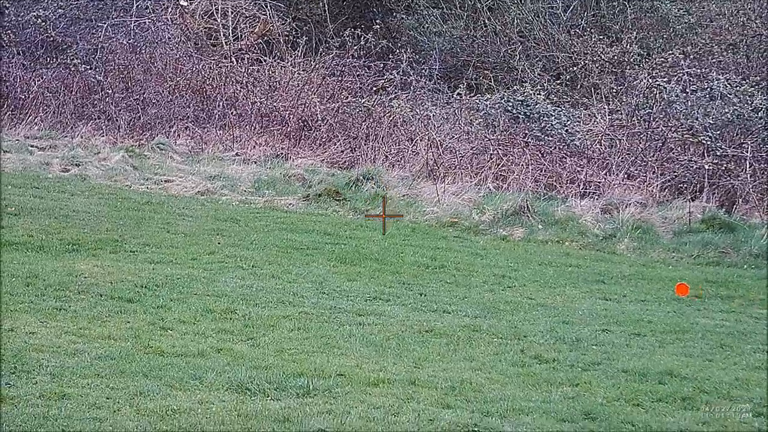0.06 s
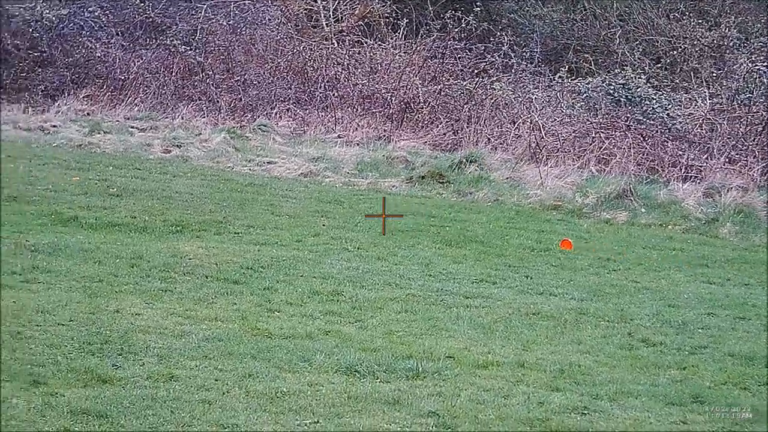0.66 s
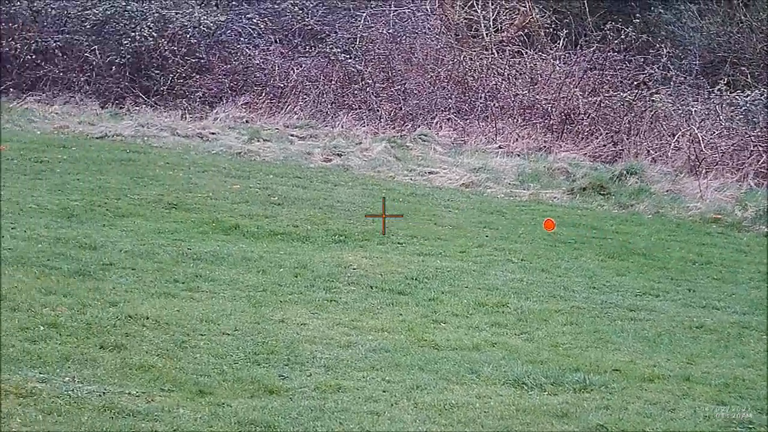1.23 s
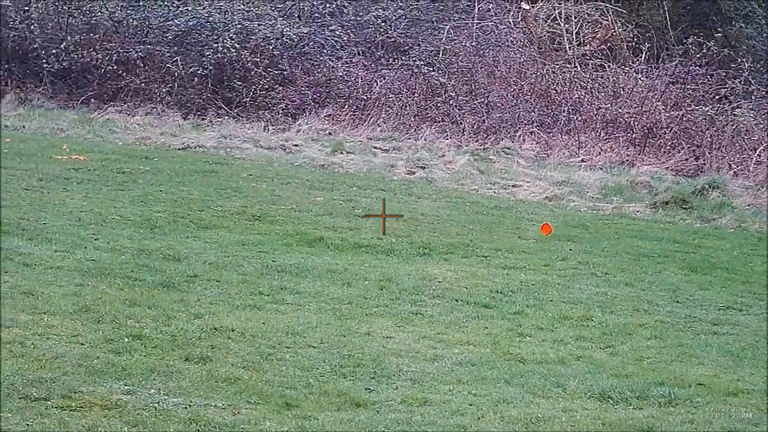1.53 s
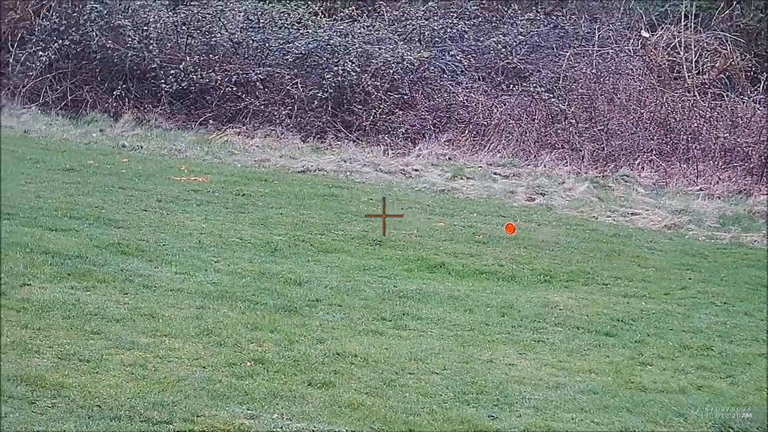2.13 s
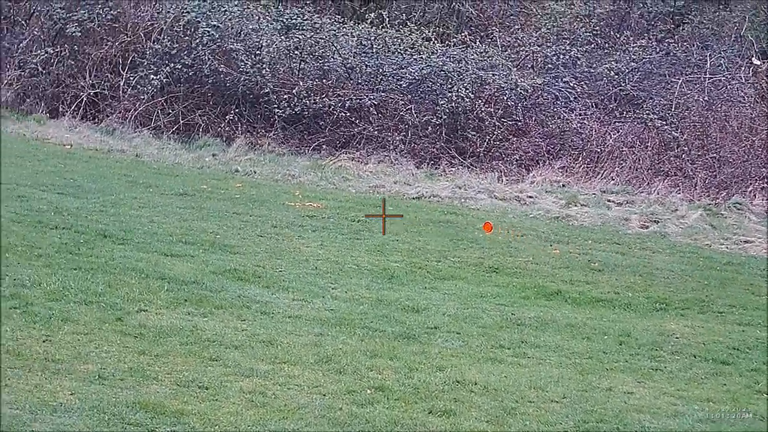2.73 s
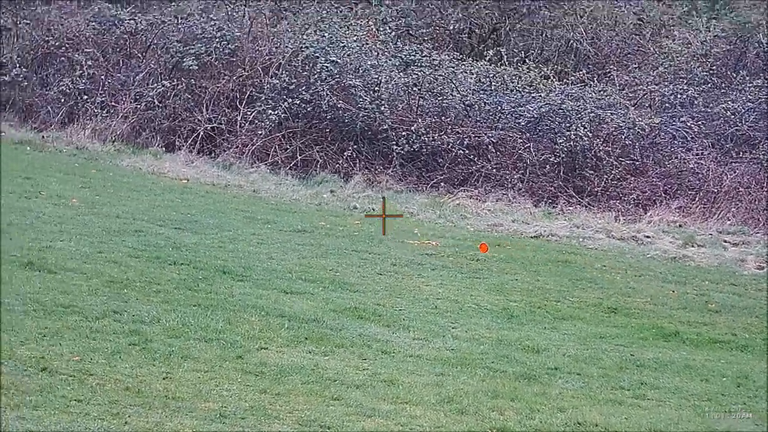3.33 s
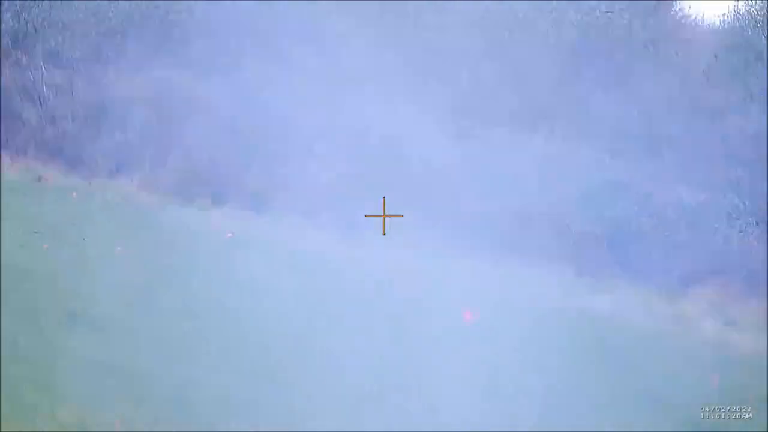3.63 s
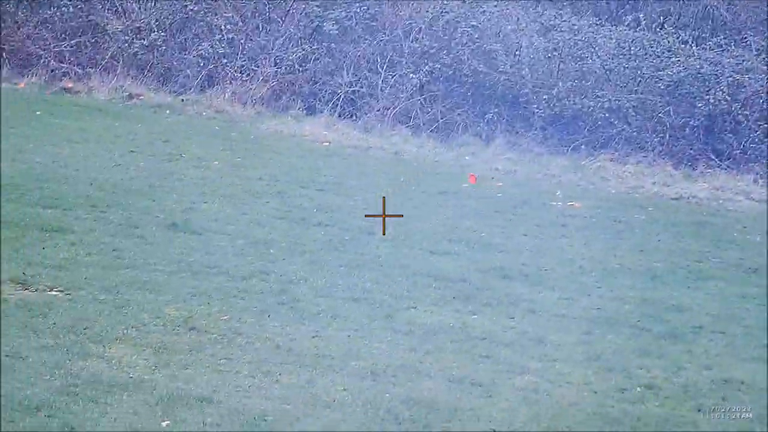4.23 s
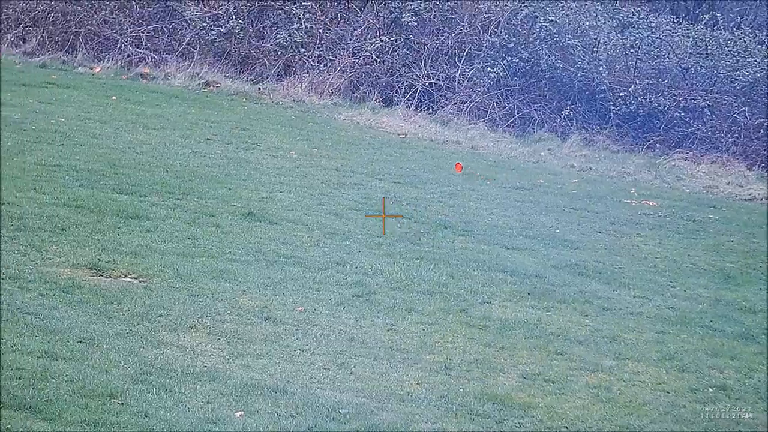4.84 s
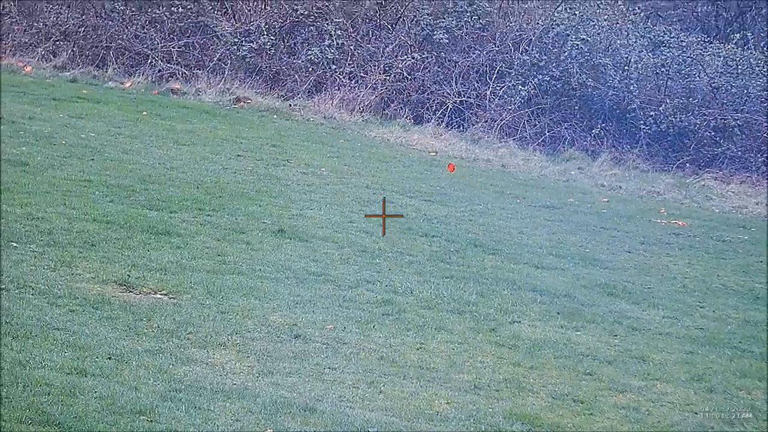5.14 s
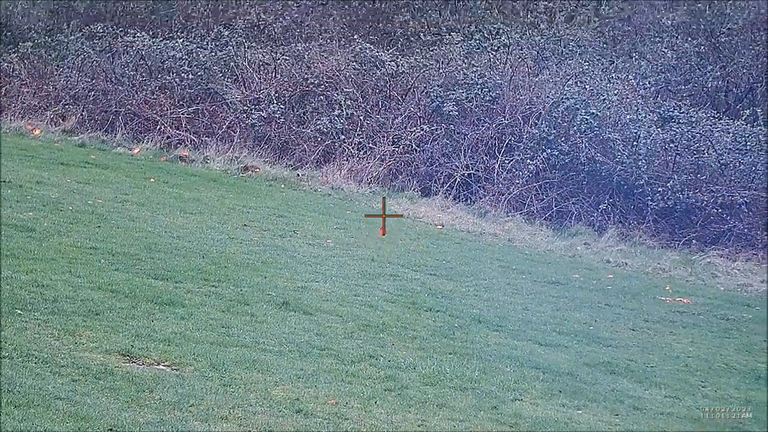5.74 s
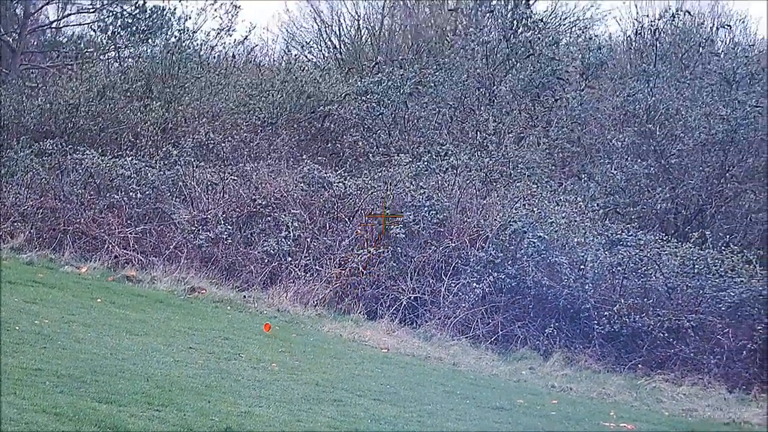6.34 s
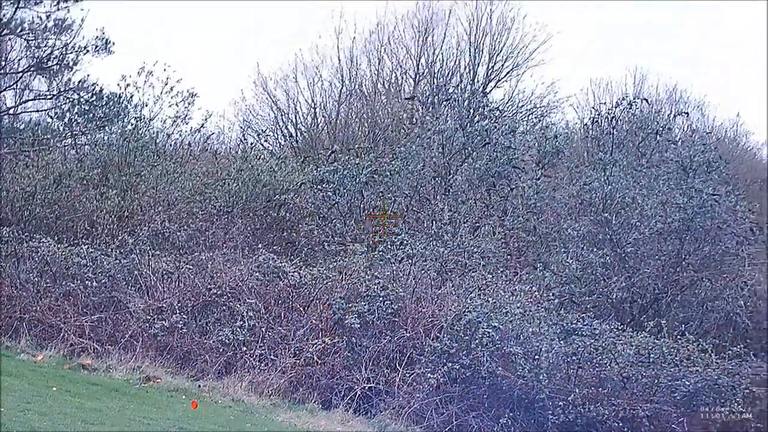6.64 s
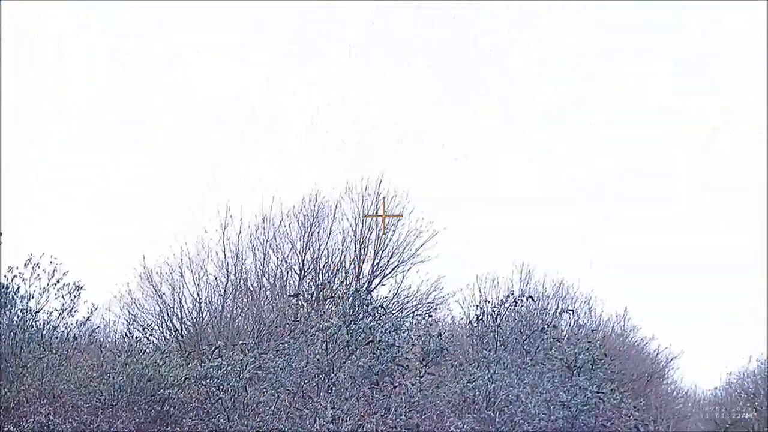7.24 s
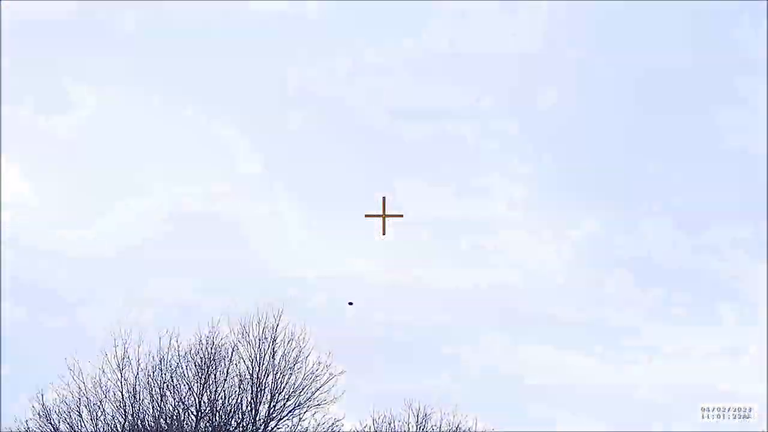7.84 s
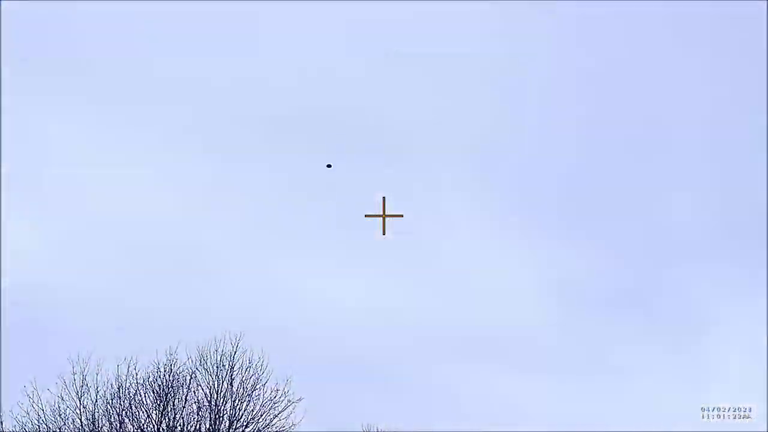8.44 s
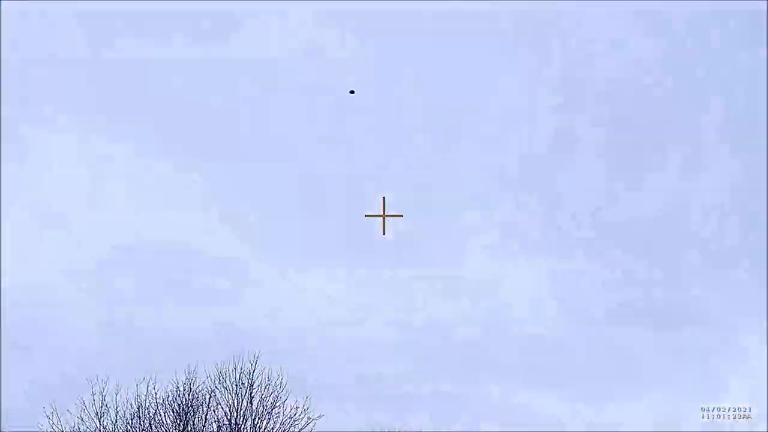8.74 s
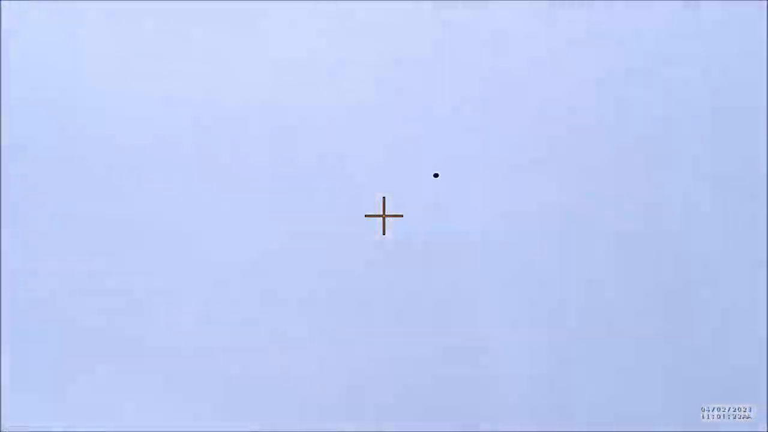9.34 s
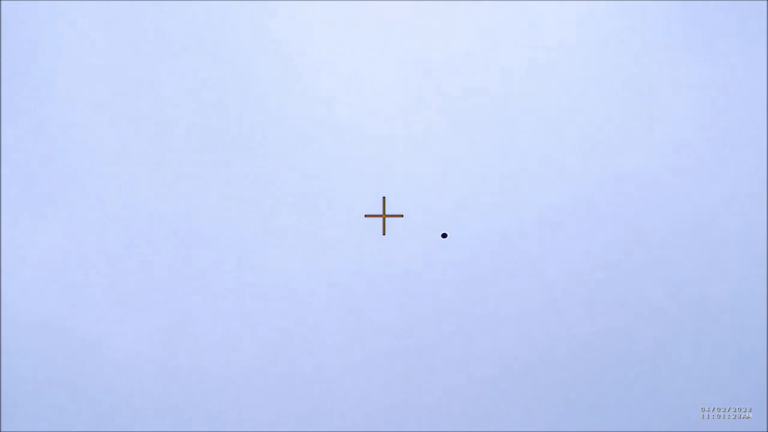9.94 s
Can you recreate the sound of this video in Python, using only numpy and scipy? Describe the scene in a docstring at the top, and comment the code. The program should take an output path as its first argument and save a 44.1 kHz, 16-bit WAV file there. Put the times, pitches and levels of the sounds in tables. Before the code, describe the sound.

A single shotgun blast bursts out of a quiet field, harsh and distorted because the microphone sits on the gun. The recoil adds a thump and a short ringing shudder. About half a second later a clack and a deep boom return from the trees, then an uneven rumbling echo fades slowly. One soft handling knock comes well before the shot and one well after, amid light hiss and very faint distant birds.

```python
"""Open field by a wood: one shotgun shot, heard by a small camera clamped to the barrel.
The hammer falls, blast and recoil overload the microphone, the barrel shudders and rings.
The wood's edge slaps back and the echo rolls away. The camera's housing colours blows and echoes.
Two soft knocks on the gun and faint birds sit in the hiss and rumble."""
import sys
import numpy as np
from scipy import signal
from scipy.fft import rfft, irfft, next_fast_len
from scipy.io import wavfile
from scipy.ndimage import map_coordinates

SR = 44100
rng = np.random.default_rng(int(sys.argv[2]) if len(sys.argv) > 2 else 0)


def digitize_waveform(pressure):
    """Quantize a signal to 16-bit integers and store it at the path in sys.argv[1].

    Rows of a 2-D input are taken as channels; values are limited to [-1, 1].
    """
    field = np.atleast_2d(pressure).T
    bounded = np.clip(field, -1, 1)
    quanta = np.round(bounded * 32767).astype(np.int16)
    wavfile.write(sys.argv[1], SR, quanta)


N = 440118
TIME = np.arange(N) / SR
SHOT_S, RECOIL_END_S = 3.7878, 3.868
WOOD_S, WOOD_RISE_S = 4.358, 0.053  # onset of the rolling echo

# Camera housing resonances. Each row: centre in Hz, width in Hz, lift in dB.
HOUSING_PEAKS = [(347, 110, 15), (722, 160, 12), (910, 55, 3.5), (1154, 240, 10), (1770, 190, 13.5),
                 (2040, 81, 9), (2620, 220, 3.5), (3995, 300, 5.5)]
# Knocks on the gun. Each row: start in seconds, level in dB.
KNOCK_HITS = [(1.302, -39.5), (9.291, -35)]
# Bird phrases. Each row: first note in seconds, last note in seconds, relative level in dB.
BIRD_PHRASES = [(1.39, 2.52, -81), (4.34, 5.69, -82), (7.28, 8.63, -83)]
# Recoil shoves on the diaphragm. Each row: start in seconds, length in seconds, peak in full scales.
RECOIL_SHOVES = [(3.8045, .0132, 11), (3.8175, .0228, -9), (3.8385, .029, -3.2)]
# Stands of trees that swell the echo. Each row: centre and half width in seconds,
# lift of the low part and of the high part in dB.
TREE_STANDS = [(4.412, .012, 8, 1), (4.675, .025, 6, -2), (4.803, .008, 3, 5), (4.845, .025, 5.5, 2.5),
               (4.93, .02, 5, -1), (5.015, .025, 5, 0), (5.185, 0.028, 5.5, 5), (5.315, .035, 9, 9),
               (5.495, .04, 9, 8), (5.6, .04, 6.5, 1.5), (6.13, .05, 3.5, 2), (7.45, .2, 2, 11)]

# Short bursts. Each row: start in seconds, relative level in dB, rise and t60 in seconds,
# low and high corner in Hz.
ACTION_BLOWS = [(3.7768, -25, 0.00088, 0.089, 400, 2502), (3.7825, -6, 0.0021, 0.021, 900, 850),
                (3.7852, -19, 0.00071, .03, 900, 4500), (3.8385, 4, 0.0017, 0.058, 400, 1460),
                (3.8665, -14, .002, .09, 697, 1190), (3.872, -21.5, 0.00086, 0.042, 900, 5000)]  # hammer, primer, recoil stop, rattle
WOOD_SLAPS = [(4.241, -46, 0.0019, 0.062, 904, 899), (4.433, -53.5, .003, 0.087, 3000, 3700),
              (4.437, -28, 0.0028, 0.064, 100, 1100), (4.480, -30.5, 0.0049, 0.13, 200, 1020),
              (4.4885, -29, 0.0036, 0.038, 1060, 3400), (5.135, -52, .004, .06, 2998, 1000)]  # distinct echoes off the wood's edge

# Damped modes. Each row: frequency in Hz, relative level in dB, t60 in seconds.
HOUSING_KNOCK_MODES = [(371, 1.5, 0.058), (408, -0.5, 0.04), (487, -4.5, 0.049), (700, -9.5, 0.027)]
CLAMP_MODES = [(132.7, 14, .07), (276, 20.5, .055), (713.6, 19.5, 0.068)]
BARREL_MODES = [(274.6, -30, 0.653), (428, -21.5, 0.141), (705, -23, 0.34), (1803.4, -6, 0.031)]
HOUSING_CLACK_MODES = [(1137, -23, 0.057), (1762, -21, 0.046), (2020, -33, 0.053), (4110, -35, 0.028)]  # rung by the sharpest echo
HOUSING_THUD_MODES = [(341, -20.5, 0.097)]  # rung by a dull echo from deep in the wood

# Noise spectra. Each row: frequency in Hz, relative density in dB.
HISS_SPECTRUM = [(100, -8), (150, 9), (350, 8), (600, 4.5), (1000, 2.5), (2500, -1), (5000, -3.5),
                 (7500, -3)]
RUMBLE_SPECTRUM = [(8, 10), (20, -0.5), (35, -6.5), (60, -12.5), (100, -20), (200, -30.5), (600, -59.5)]
BLAST_SPECTRUM = [(20, -10), (70, -2), (200, -5), (400, -1), (550, -8), (1000, -8), (1600, -9), (3000, -21),
                  (7000, -30)]
WASH_SPECTRUM = [(20, -9.5), (90, 3.5), (150, -1), (270, 1.5), (345, -6), (450, -3.5), (700, -4.5),
                 (1500, -15), (3000, -17), (4000, -19.5), (7000, -22)]  # blast off grass and hedge
ROLL_LOW_SPECTRUM = [(50, -29), (120, -13.5), (230, -6.5), (450, -6.5), (650, -13), (1000, -32.5),
                     (2000, -70)]
ROLL_HIGH_SPECTRUM = [(300, -25), (550, -3.5), (750, -1), (1200, -8), (1700, -16), (2200, -13.5),
                      (3300, -16.5), (4200, -23), (8000, -56)]
BOOM_SPECTRUM = [(8, -19), (22, 10.5), (55, -9.5), (100, -24), (200, -37), (600, -71)]


def amp(db):
    return 10 ** (np.asarray(db) / 20)


def unit_rms(x):
    return x / np.sqrt(np.mean(x ** 2) + 1e-20)


def wobble(rate_hz):
    """Smooth random curve, rate_hz knots a second."""
    coarse_s = TIME[::16]
    knots = rng.standard_normal(int(N * rate_hz / SR) + 4)
    return np.interp(TIME, coarse_s, map_coordinates(knots, [coarse_s * rate_hz], order=2))


def filtered(x, response):
    """Zero-phase filter with gain response(hz)."""
    size = next_fast_len(N + 8192)
    return irfft(rfft(x, size) * response(np.fft.rfftfreq(size, 1 / SR)), size)[:N]


def housing(hz):
    """Gain of the camera's closed, resonant shell."""
    return amp(sum(db / (1 + (2 * (hz - centre_hz) / width_hz) ** 2)
                   for centre_hz, width_hz, db in HOUSING_PEAKS))


def noise(spectrum, housed=True):
    """Shaped noise of rms 1, by default through the housing."""
    points_hz, points_db = np.transpose(spectrum)

    def response(hz):
        db = np.interp(np.log(hz + 1), np.log(points_hz + 1), points_db)
        return amp(db) * (housing(hz) if housed else 1)
    return unit_rms(filtered(rng.standard_normal(N), response))


def burst(start_s, rise_s, t60_s):
    """Envelope: rise, then exponential fall."""
    out, first = np.zeros(N), round(start_s * SR)
    age_s = np.arange(min(2 * t60_s * SR, N - first)) / SR
    out[first:][:len(age_s)] = (1 - np.exp(-age_s / rise_s)) * amp(-60 * age_s / t60_s)
    return out


def ringing(modes, start_s, rise_s):
    """Damped modes struck together."""
    out, age_s = np.zeros(N + SR), np.arange(SR) / SR
    ring = sum(amp(db - 60 * age_s / t60_s) * np.sin(2 * np.pi * hz * age_s) for hz, db, t60_s in modes)
    out[round(start_s * SR):][:SR] = ring * (1 - np.exp(-age_s / rise_s))
    return out[:N]


def air_loss(x, start_s, limit_s, db_per_khz_s=12):
    """Later sound has crossed more air and lost more above 1 kHz."""
    hz, time_s, spectra = signal.stft(x, SR, nperseg=512)
    loss_db = db_per_khz_s * np.outer(hz / 1000 - 1, np.clip(time_s - start_s, 0, limit_s))
    return signal.istft(spectra * amp(-np.maximum(loss_db, 0)), SR, nperseg=512)[1][:N]


def noise_floor():
    """Microphone hiss and uneven low rumble."""
    hiss = amp(-70.5) * noise(HISS_SPECTRUM, housed=False)
    rumble = amp(-56.5) * noise(RUMBLE_SPECTRUM, housed=False) * amp(1.7 * wobble(6.2))
    return hiss + rumble


def knocks():
    """Soft contacts ring only the housing's low modes."""
    return sum(amp(db) * ringing(HOUSING_KNOCK_MODES, start_s, rise_s=0.0061)
               for start_s, db in KNOCK_HITS)


def birds(note_hz=5790, trill_hz=4500, step_s=0.225):
    """Far birds: thin high notes alternate with lower, fluttering syllables."""
    def tone(hz):
        return np.sin(2 * np.pi * np.cumsum(hz * (1 + 0.01 * wobble(300))) / SR)

    high, low = np.zeros(N), np.zeros(N)
    note, syllable = np.hanning(round(0.12 * SR)), np.hanning(round(0.36 * SR))
    for first_s, last_s, db in BIRD_PHRASES:
        for at_s in np.arange(first_s, last_s + step_s / 2, step_s):
            high[round(at_s * SR) - len(note) // 2:][:len(note)] += amp(db) * note
            low[round((at_s - step_s / 2) * SR) - len(syllable) // 2:][:len(syllable)] += amp(db) * syllable
    return amp(2) * high * tone(note_hz) + amp(-2 + 2.5 * wobble(40)) * low * tone(trill_hz)


def blows(rows):
    """Impacts or slap echoes: noise bursts that ring the housing, each in its own band."""
    out, size = np.zeros(N), 16384
    hz = np.fft.rfftfreq(size, 1 / SR)
    age_s = np.arange(size) / SR
    shell = housing(hz)
    for start_s, db, rise_s, t60_s, low_hz, high_hz in rows:
        band = hz / (hz + low_hz) ** 2 / np.sqrt(1 + (hz / high_hz) ** 10)
        phases = np.exp(2j * np.pi * rng.random(len(hz)))
        envelope = 2 * amp(db - 60 * age_s / t60_s) * (1 - np.exp(-age_s / rise_s))
        out[round(start_s * SR):][:size] += unit_rms(irfft(phases * shell * band)) * envelope
    return out


def blast():
    """Muzzle blast, far above full scale: jolts the clamp, washes back off grass and hedge."""
    report = amp(20) * burst(SHOT_S, rise_s=0.0015, t60_s=0.064) * noise(BLAST_SPECTRUM, housed=False)
    jolt = ringing(CLAMP_MODES, SHOT_S, rise_s=0.00076)
    wash = air_loss(noise(WASH_SPECTRUM), SHOT_S, limit_s=1)
    near = amp(-8) * burst(SHOT_S, rise_s=0.013, t60_s=0.36)
    far = amp(-34) * burst(SHOT_S, rise_s=0.05, t60_s=1.6)
    return report - jolt + wash * (near + far)


def recoil(shudder_hz=38.8):
    """The gun kicks; the barrel shudders and rings while the microphone's bias creeps back."""
    kick = sum(peak * np.sin(np.pi * np.clip((TIME - start_s) / length_s, 0, 1))
               for start_s, length_s, peak in RECOIL_SHOVES)
    swing = amp(-6.5) * burst(RECOIL_END_S, rise_s=0.0024, t60_s=0.25)
    swing += amp(-21) * burst(RECOIL_END_S, rise_s=0.012, t60_s=1.2)
    shudder = swing * np.sin(2 * np.pi * shudder_hz * (TIME - RECOIL_END_S))
    ring = ringing(BARREL_MODES, RECOIL_END_S, rise_s=0.004)
    creep = amp(-4.5) * burst(3.888, rise_s=0.0073, t60_s=0.67)
    return kick + shudder + ring + creep


def rolling_echo():
    """Countless reflections off field, wood and far country, swelling at stands of trees."""
    field = amp(-46.5) * burst(4.19, rise_s=0.16, t60_s=3.15)
    far = amp(-55.5) * burst(WOOD_S, WOOD_RISE_S, t60_s=10.7)
    low_gain = amp(-43.5) * burst(WOOD_S, WOOD_RISE_S, t60_s=3.28) + far + amp(-9.5) * field
    high_gain = amp(-47.5) * burst(WOOD_S, WOOD_RISE_S, t60_s=2.12) + amp(-13.5) * far + field
    low_lift_db, high_lift_db = sum(np.outer(lifts_db, np.exp(-((TIME - at_s) / half_width_s) ** 2))
                                    for at_s, half_width_s, *lifts_db in TREE_STANDS)
    peals = amp(0.95 * wobble(28))
    low = unit_rms(noise(ROLL_LOW_SPECTRUM) * peals)
    flutter = amp(1.3 * wobble(120))  # single trunks and branches
    high = unit_rms(air_loss(noise(ROLL_HIGH_SPECTRUM), start_s=4.17, limit_s=1.8) * peals * flutter)
    return low * low_gain * amp(low_lift_db) + high * high_gain * amp(high_lift_db)


def slap_echoes():
    """Distinct returns from the wood ring the housing."""
    clack = ringing(HOUSING_CLACK_MODES, start_s=4.4885, rise_s=0.0025)
    thud = ringing(HOUSING_THUD_MODES, start_s=4.606, rise_s=0.0075)
    return blows(WOOD_SLAPS) + clack + thud


def boom():
    """The pressure wave returns from the wood's edge and lingers among the trees."""
    wave = amp(-15.5) * burst(4.435, rise_s=0.053, t60_s=0.29)
    tail = amp(-44.5) * burst(WOOD_S, WOOD_RISE_S, t60_s=3.6)
    return (wave + tail) * noise(BOOM_SPECTRUM, housed=False)


def scene():
    """Gun, echoes and quiet field at one microphone."""
    gun = blows(ACTION_BLOWS) + blast() + recoil()
    echoes = slap_echoes() + rolling_echo() + boom()
    return (gun + echoes + knocks() + birds() + noise_floor())[None]


def record(dry):
    """Narrow-band input stage, hard clip at full scale, treble shelf, band limit."""
    input_hz, top_hz, shelf_db = 7750, 16400, -13.5
    narrow = filtered(dry[0], lambda hz: 1 / np.sqrt(1 + (hz / input_hz) ** 60))
    clipped = np.clip(narrow, -1, 1)
    # Clipping overtones pass only weakly above the input band.
    softened = filtered(clipped, lambda hz: amp(shelf_db * np.clip((hz - 6500) / 2500, 0, 1)))
    return filtered(softened, lambda hz: 1 / np.sqrt(1 + (hz / top_hz) ** 80))[None]


dry = scene()
out = record(dry)
digitize_waveform(out)
```